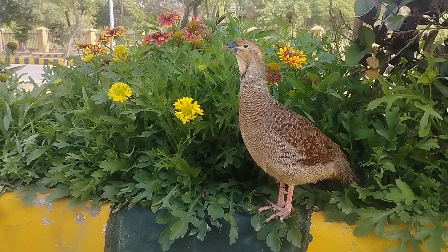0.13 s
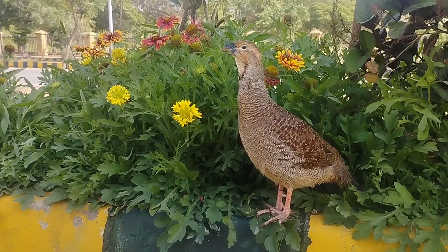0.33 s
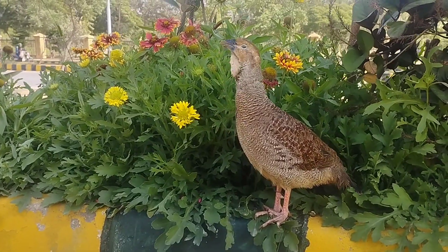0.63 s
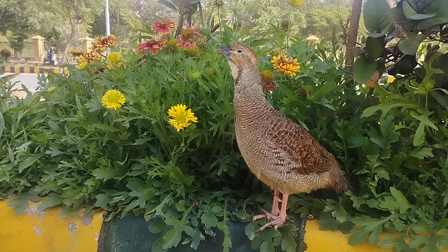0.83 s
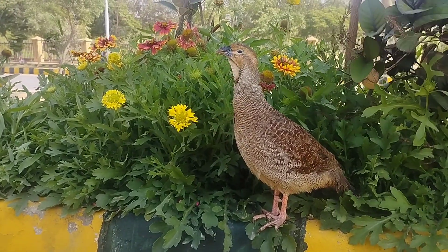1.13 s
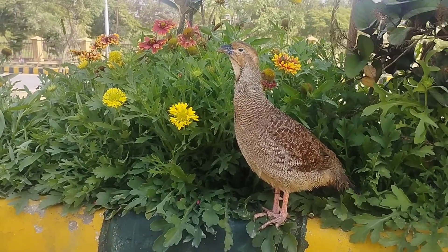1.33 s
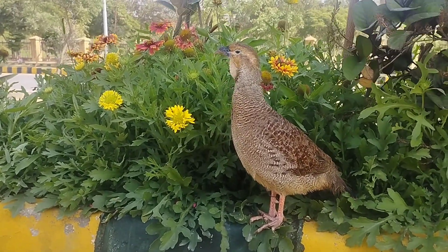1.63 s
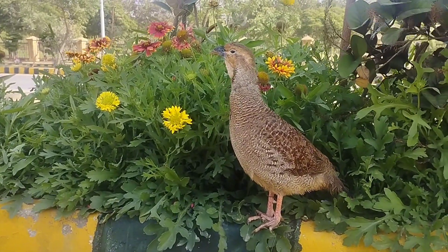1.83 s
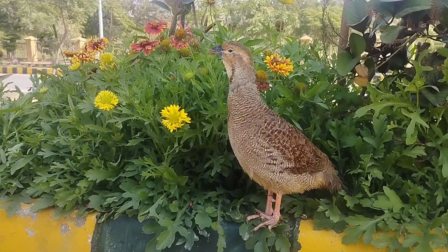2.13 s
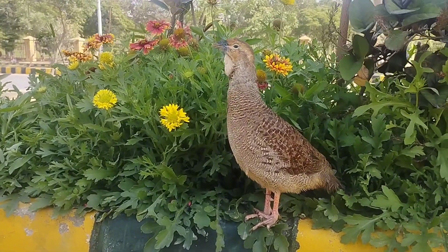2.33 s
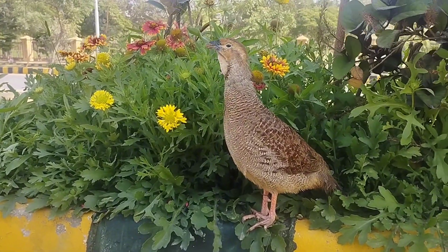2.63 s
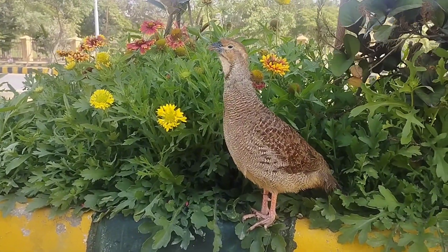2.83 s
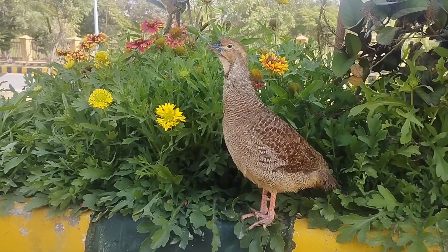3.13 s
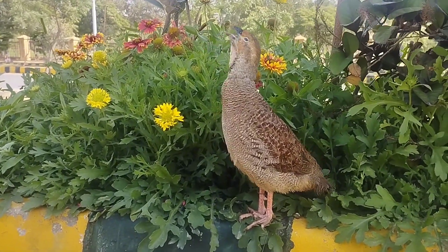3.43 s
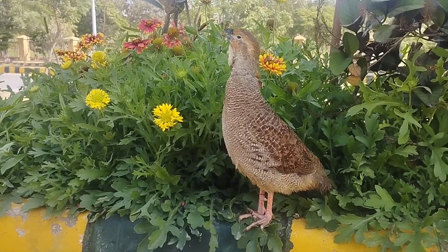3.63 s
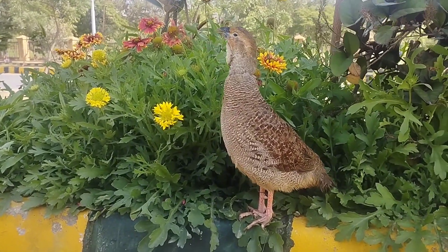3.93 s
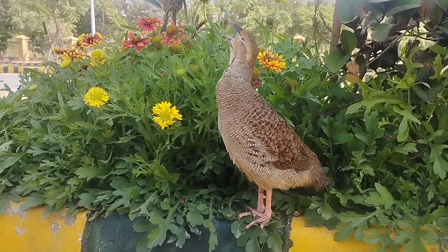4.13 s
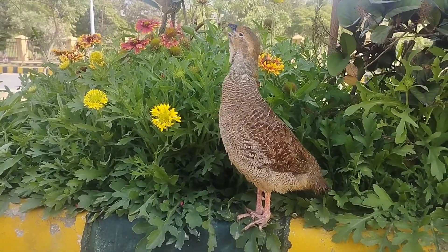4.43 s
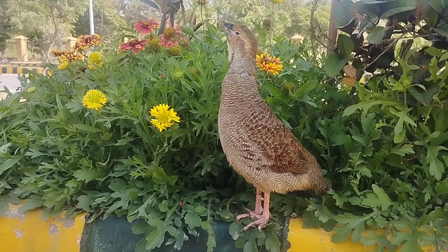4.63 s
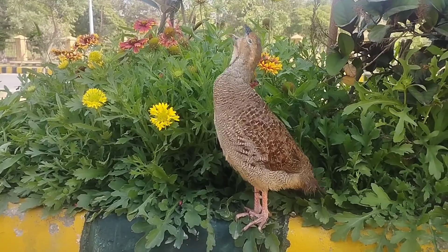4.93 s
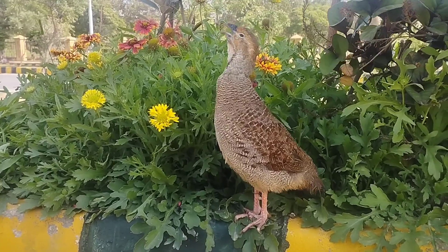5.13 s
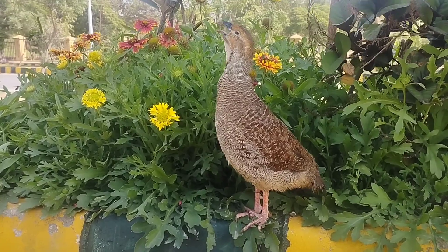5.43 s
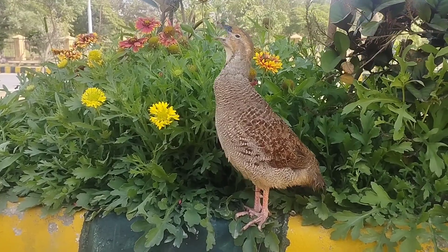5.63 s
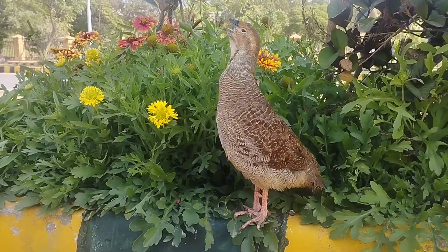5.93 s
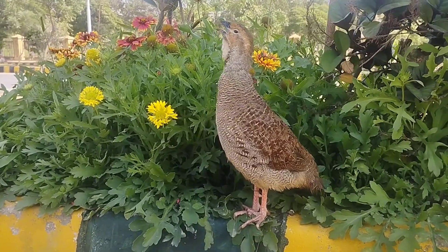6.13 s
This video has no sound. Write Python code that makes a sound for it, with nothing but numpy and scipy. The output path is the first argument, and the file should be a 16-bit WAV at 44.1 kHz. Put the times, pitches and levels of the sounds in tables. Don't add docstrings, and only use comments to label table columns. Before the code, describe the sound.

Outdoors, close to a phone in roadside plants, two francolins duet. From the start a low motor hums, swelling and then cutting out around 1 s; soft distant traffic continues. One bird gives loud, breathy whistles, each about a quarter second and sliding upward, at 0.5, 1.3, 2.2, 3.0, 3.9, 4.8 and 5.5 s. The mate, on the left, adds small murmurs and short arched notes near 0.65 and 2.3 s. A tiny dry leaf snap comes at 1.85 s. From about 3.4 s the mate chatters strongly: sharp two-note calls at 3.4, 4.2, 5.0 and 5.8 s, followed by runs of lower throaty clucks and rasps, ending with a loud pair after 6.1 s. Short leafy reflections surround the calls. Wind rumbles and thumps from 0.8 s onward, strongest near 1.3 and 4.5 s, while a faint engine swells and fades.

```python
import sys
import numpy as np
from scipy import signal
from scipy.fft import rfft, irfft
from scipy.io import wavfile
from scipy.ndimage import uniform_filter1d, minimum_filter1d

SR = 44100
rng = np.random.default_rng(int(sys.argv[2]) if len(sys.argv) > 2 else 0)


def magnitude_from_level(level_db):
    exponent = np.asarray(level_db, float) / 20
    return 10 ** exponent


def wav_out(sig):
    wavfile.write(sys.argv[1], SR, np.round(np.clip(np.atleast_2d(sig).T, -1, 1) * 32767).astype(np.int16))


N = 277389
TIME = np.arange(N) / SR
HZ = np.fft.rfftfreq(N, 1 / SR)


def unit(x):
    return x / np.sqrt(np.mean(x ** 2))


def shape(points, hz):
    at, db = np.transpose(points)
    return magnitude_from_level(np.interp(np.log(np.maximum(hz, 1)), np.log(at), db))


def band(x, lo_hz, hi_hz, order=2):
    sos = signal.butter(order, [lo_hz, min(hi_hz, .45 * SR)], "band", fs=SR, output="sos")
    return signal.sosfilt(sos, x)


def filtered(x, gain):
    return irfft(rfft(x) * gain, N)


def hiss(gain):
    return unit(filtered(rng.standard_normal(N), gain))


def walk(rate):
    k = int(SR / rate)
    steps = np.repeat(rng.standard_normal(N // k + 1), k)
    return unit(uniform_filter1d(uniform_filter1d(steps, k), k)[:N])


def swell(size, peak, sharp):
    u, peak = np.linspace(0, 1, size), np.clip(peak, .05, .95)
    ramp = np.where(u < peak, u / peak, (1 - u) / (1 - peak))
    return np.sin(np.pi / 2 * ramp) ** sharp


def edges(t, length, start_db, attack_s, end_db, release_s):
    start = start_db * np.exp(np.minimum(-t / attack_s, 5))
    end = end_db * np.exp(np.minimum((t - length) / release_s, 5))
    return magnitude_from_level(-start - end)


def glide(hz):
    return 2 * np.pi * np.cumsum(hz) / SR


def add(track, s, sound):
    i = int(s * SR)
    track[i:i + len(sound)] += sound[:N - i]


# (frequency [Hz], level [dB per Hz])
TRAFFIC = [(59, -28.5), (100, 0), (219, -10.5), (264, -9), (306, -7.5), (363, -31.5), (387, -39.5),
           (458, -17.5), (810, -32), (1430, -35), (1560, -37.5), (2050, -29.5), (15600, -62.5)]
TRAFFIC_DB = -40.5


def traffic():
    out, rise = 0, walk(0.78)
    notch = 1 - 0.87 * np.exp(-((HZ - 8500) / 2000) ** 2)
    for hz in 100 * 2. ** np.arange(8):
        octave = np.exp(-(np.log2(np.maximum(HZ, 1) / hz) / 0.756) ** 2)
        gain = shape(TRAFFIC, HZ) * notch * octave
        mid, side = hiss(gain), hiss(gain) * (.2 if hz < 1000 else .95)
        strength = np.sqrt(np.mean(gain ** 2) * (1 if hz > 250 else .5))
        flicker = magnitude_from_level(rise / 2 + (3.6 if hz < 1000 else 1) * walk(4.9))
        out = out + strength * flicker * np.array([mid + side, mid - side])
    return unit(out) * magnitude_from_level(TRAFFIC_DB + 4.0)


# (time [s], pitch [Hz], level [dB])
HUM = [
    (0.0, 135.8, -24),
    (0.49, 137.2, -18.5),
    (0.682, 137.7, -23.5),
    (0.932, 138.3, -17.5),
    (1.0, 138.7, -25),
    (1.08, 145, -45),
]
# (multiple of the pitch, level [dB])
HUM_ORDERS = [(1.003, 0.5), (1.335, -15), (2, -19), (3.078, -27.5)]
# (time [s], pitch [Hz], level [dB])
ENGINE = [
    (1.1, 282.1, -63.5),
    (1.68, 302.2, -37),
    (3.21, 310.5, -65),
    (3.34, 282.7, -38.5),
    (4.37, 306, -40),
    (4.45, 284.3, -35.5),
    (4.97, 298, -44),
    (6.29, 295, -32),
]
# (pitch [Hz], width [Hz], level [dB])
DRONES = [(98, 28, -38), (359.4, 4.8, -56), (448.2, 15, -49.5), (527.8, 21, -50.5), (618, 110, -54)]


def level_curve(table):
    s, _, db = np.transpose(table)
    return magnitude_from_level(np.interp(TIME, s, db, -200, -200))


def motors():
    s, hz, _ = np.transpose(HUM)
    phase = glide(np.interp(TIME, s, hz) * (1 + 0.0059 * walk(25)))
    stack = sum(magnitude_from_level(order_db + 0.55 * walk(30.0)) * np.sin(k * phase) for k, order_db in HUM_ORDERS)
    hum = np.sqrt(2) * uniform_filter1d(level_curve(HUM), size=900) * stack
    s, hz, _ = np.transpose(ENGINE)
    phase = glide(np.interp(TIME, s, hz) * (1 + 0.01589 * walk(30)))
    far = np.sqrt(2) * level_curve(ENGINE) * magnitude_from_level(0.32 * walk(25)) * np.sin(phase)
    for hz, width, db in DRONES:
        far = far + magnitude_from_level(db + 2.2 * walk(1.1)) * hiss(1 / (1 + (2 * (HZ - hz) / width) ** 2))
    late = np.roll(hum, 40) + np.roll(far, 15)
    return np.array([(hum + far) * magnitude_from_level(-1.1), late * magnitude_from_level(-2.5)])


# (time [s], rumble level [dB], left minus right [dB])
WIND = [(0.0, -36, -2.5), (0.77, -38, 6.5), (1.35, -22, -4.5), (1.4, -33.5, 9), (2.08, -33.5, -2),
        (2.47, -33.5, 18), (2.66, -33, -1.5), (3.13, -39, 11), (3.43, -34.5, -3), (3.61, -35.5, 11.5),
        (3.73, -26.5, -2), (4.311, -42.5, 8), (4.48, -19.5, 6.5), (5.04, -38.5, 10), (5.259, -27, -2),
        (5.68, -36.5, 13), (6.03, -35, -4.5), (6.29, -31.5, 3)]
# (time [s], peak level [dB], left minus right [dB])
THUMPS = [(0.83, -13, 1), (1.21, -9, -0.5), (1.26, -7, -2.5), (1.318, -3.5, 1.5), (1.611, -4.5, -10),
          (1.762, -16.5, -0.5), (2.187, -12.5, 1.5), (2.214, -4, 8), (2.419, -15, 17), (2.54, -9.5, -7.5),
          (2.839, -11, 4.5), (3.572, -15.5, 2.5), (3.649, -6.5, -1.5), (3.93, -9, 3), (4.423, -8.5, -4.5),
          (4.539, -10, 9), (4.68, -7.5, 0), (4.751, -9.5, -5), (5.22, -14.5, 1.5), (5.45, -9, 8.5),
          (5.93, -9, 4.5)]
FLUTTER_DB, FLUTTER_LAG = -7, 0.25
RUMBLE_WALK_DB = 3


def wind():
    s, *columns = np.transpose(WIND)
    db, pan_db = (np.interp(TIME, s, c) for c in columns)
    flutter_db = FLUTTER_DB - FLUTTER_LAG * (db + 34.5)
    deep = shape([(10, -22.5), (25, 7.5), (60, 8.0), (110, -1.0), (200, -10.5), (400, -71.5)], HZ)
    colour = shape([(60, -22.5), (120, 12.0), (250, 0.5), (500, -9.5), (1000, -70.5)], HZ)
    shared = hiss(colour) * magnitude_from_level(2.43 * walk(30))
    out = []
    for side in (1, -1):
        rumble = hiss(deep) * magnitude_from_level(RUMBLE_WALK_DB * walk(12))
        flutter = 0.644 * hiss(colour) * magnitude_from_level(2.4 * walk(38)) + 0.69 * shared
        port = magnitude_from_level(db + 2.5 + side * pan_db / 2) * (rumble + magnitude_from_level(flutter_db + 3.5) * flutter)
        for s, thump_db, left_db in THUMPS:
            thump = unit(band(rng.standard_normal(2600), 51, 238)) * swell(2600, 0.25, 10.0)
            add(port, s - .008, magnitude_from_level(thump_db - 14.0 + side * left_db / 2) * thump)
        out.append(port)
    return np.array(out)


# (time [s], peak level [dB])
TICK = [
    (1.847, -45),
]


def leaf():
    out = np.zeros(N)
    for s, db in TICK:
        snap = unit(band(rng.standard_normal(300), 3800, 11000))
        add(out, s, magnitude_from_level(db) * snap * np.exp(-np.arange(300) / 70))
    return out


def echoes(x, t60, wait_s, lo_hz, hi_hz):
    t = np.arange(SR // 2) / SR
    tail = rng.standard_normal((2, len(t))) * magnitude_from_level(-60 * t / t60) * np.clip(t / wait_s, 0, 1)
    tail = band(tail, lo_hz, hi_hz)
    return signal.fftconvolve(x[None], tail / np.sqrt(np.sum(tail[0] ** 2)), axes=1)[:, :N]


# (frequency [Hz], level [dB])
SHADOW = [(700, 0.5), (1700, 5.5), (2600, -20.5), (3600, 4.5), (4500, -5.5), (6000, 3.5), (9600, 5.5),
          (13500, 22.5)]


def from_left(x, lead):
    turn = np.exp(.5j * lead) * np.sqrt(shape(SHADOW, HZ))
    return filtered(x, np.array([turn, 1 / turn]))


# (time [s], pace [ratio], steady pitch [Hz], falling pitch [Hz], falling level [dB])
PHRASES = [
    (3.427, 0.7755, 1857, 2217, -14.5),
    (4.235, 0.977, 1912, 2279, -15.5),
    (4.999, 1.01, 1934, 2361, -12),
    (5.758, 1.0425, 2422, 2296, -9.5),
]
# (time from the steady note [s], length [s], throat [Hz], peak [dB], treble [dB])
CALL_RASPS = [
    (-0.05, 0.0387, 2000, -30.5, 5.5),
    (-0.011, 0.024, 1710, -28.5, 2),
    (0.028, 0.026, 1770, -37, 9),
    (0.099, 0.02086, 1685, -30.5, -4.5),
]
# (time of the note [s], length [s], start pitch [Hz], note level [dB], rasp level [dB])
CLUCKS = [
    (4.484, 0.0338, 1583, -7, -15),
    (4.605, 0.0305, 1500, -10.5, -17.5),
    (4.726, 0.021, 1446, -10, -20.5),
    (4.837, 0.026, 1443, -21, -24.5),
    (5.262, 0.0342, 1838, -10.5, -19.5),
    (5.392, 0.0324, 1592, -9.5, -15.5),
    (5.513, 0.0331, 1555, -11, -18),
    (5.629, 0.023, 1543, -16.5, -29),
    (6.163, 0.0361, 1621, -8.5, -17),
    (6.281, 0.11, 1631, -13.5, -23),
]
# (time [s], length [s], throat [Hz], peak [dB], treble [dB])
MURMURS = [(0.038, 0.069, 1116, -45.5, -8), (0.625, 0.029, 1600, -24, -16.5),
           (0.891, 0.0098, 1446, -46, -12), (1.608, 0.045, 1208, -41, -18.5),
           (1.64, 0.056, 950, -38.5, -18.5), (2.259, 0.027, 1649, -22, -17.5),
           (2.511, 0.069, 1021, -31, -28.5), (2.627, 0.074, 1102, -39, -28.5),
           (3.322, 0.024, 1787, -29.5, -31.5), (3.372, 0.035, 1943, -20, -22),
           (3.64, 0.0545, 1325, -22.5, -17), (3.752, 0.0551, 1249, -23.5, -25),
           (3.863, 0.0656, 1145, -26.5, -39.5), (3.958, 0.06, 1347, -27, -24),
           (6.008, 0.0378, 1954, -17, -3.5), (6.043, 0.037, 2000, -39, 11.5)]
MURMUR_PEAK = 0.504
CLUCK_LEAD_S, CLUCK_THROAT, CLUCK_TREBLE_DB, TREBLE_DB_PER_KHZ = 0.01907, 1, -14.5, 39.5
UNDER_DB, UNDER_THROAT = -14, 0.9


def bursts():
    rows = [(*m, MURMUR_PEAK) for m in MURMURS]
    for s, pace, *_ in PHRASES:
        rows += [(s + at * pace, *rest, 0.3) for at, *rest in CALL_RASPS]
    for s, length, hz, _, db in CLUCKS:
        treble_db = CLUCK_TREBLE_DB + TREBLE_DB_PER_KHZ * (hz - 1500) / 1000
        rows += [(s - CLUCK_LEAD_S, CLUCK_LEAD_S + 0.00907, CLUCK_THROAT * hz, db, treble_db, 0.7),
                 (s, length + 0.01243, UNDER_THROAT * hz, db + UNDER_DB, treble_db + 5.5, 0.6)]
    return rows


# (frequency [Hz], level [dB])
THROAT = [(1500, -10.5), (2900, 3), (3900, -1), (4500, 3.5), (5300, -6), (6000, -10.5), (8300, -22),
          (10000, -24.5), (15500, -27.5)]


def rasps():
    out, slaps = np.zeros(N), np.zeros(N)
    gaps = SR / 480 * np.exp(.22 * rng.standard_normal(N // 40))
    at = np.cumsum(gaps).astype(int)
    at = at[at < N]
    slaps[at] = magnitude_from_level(2 * rng.standard_normal(len(at)))
    source = unit(slaps) + .9 * rng.standard_normal(N)
    treble_only = (HZ > 3000) / (1 + (4100 / np.maximum(HZ, 1)) ** 12) / (1 + (HZ / 12000) ** 2)
    treble = hiss(shape(THROAT, HZ) * treble_only) * (0.807 + unit(uniform_filter1d(slaps, size=60)) / 10)
    for s, length, throat_hz, db, treble_db, peak in bursts():
        i, size = int(s * SR), int(length * SR)
        push = source[i:i + size]
        low = band(push, 932.7, 1152.7) + 0.963 * band(push, 1392, 1459)
        middle = 1.523 * band(push, 0.692 * throat_hz, 1.278 * throat_hz)
        middle = middle + magnitude_from_level(5.0 + 0.5 * (db + 19)) * band(push, 1790, 1942)
        high = band(push, 2326, 2500)
        beak = 0.21 * magnitude_from_level(0.69 * (db + 19.0)) * band(push, 2554, 3168, order=3)
        body = unit(low + magnitude_from_level(.45 * (db + 17)) * (.85 * middle + .45 * high + beak))
        rise = swell(len(push), peak, 1.0)
        add(out, s, magnitude_from_level(db) * rise * (body + magnitude_from_level(treble_db - 2.0) * rise * treble[i:i + size]))
    return out


# (time from the steady note [s], length [s], start [Hz], end [Hz], peak [dB])
OPENING = [
    (-0.044, 0.013, 2317, 2400, -19),
    (-0.038, 0.022, 1803, 1820, -16),
    (-0.024, 0.01, 2650, 2350, -19),
    (-0.02, 0.019, 895, 1000, -24.5),
]
# (time from the steady note [s], length [s], start [Hz], end [Hz], peak [dB])
LINKS = [
    (0.028, 0.015, 921.3, 921.3, -31),
    (0.051, 0.016, 1890, 1968, -30),
    (0.1, 0.014, 1950, 1750, -24.5),
]
# (time [s], length [s], start pitch [Hz], end pitch [Hz], peak [dB])
CHIRPS = [(0.049, 0.055, 1026, 872.5, -41.5), (1.613, 0.038, 1050, 877.3, -44),
          (0.646, 0.012, 888, 972.4, -28.5), (0.678, 0.034, 1177, 939, -26),
          (2.34, 0.026, 1221, 872.4, -25), (2.529, 0.051, 1075, 954, -29.5),
          (2.639, 0.031, 1070, 951.4, -34), (3.33, 0.012, 995, 1065, -31.5),
          (3.38, 0.032, 971.6, 970, -22.5), (3.392, 0.019, 2086, 1842, -9),
          (3.414, 0.013, 855.6, 874, -25.5), (3.484, 0.049, 1103, 941, -44.5),
          (3.501, 0.018, 1477, 1310, -26), (3.665, 0.01, 1512, 1373, -18), (3.682, 0.02, 1118, 963.5, -23),
          (3.78, 0.0268, 1181, 1036, -21.5), (3.88, 0.028, 1094, 989.5, -19.5),
          (3.976, 0.0399, 1058, 960, -28.5), (4.742, 0.023, 1262, 1038, -18),
          (5.288, 0.02474, 2014, 1725, -15.5),  (6.03, 0.022, 1768, 1850, -1),
          (6.046, 0.0359, 2114, 1812, -13.5)]
# (time [s], length [s], start pitch [Hz], end pitch [Hz], peak [dB])
ARCHES = [
    (0.647, 0.039, 1386, 1268, -15.5),
    (2.28, 0.062, 1472, 1273, -11.5),
]
# (time [s], pitch [Hz], peak [dB])
BREAKS = [(3.469, 1967, -12.5), (5.052, 1903, -21), (5.785, 2033, -6), (5.813, 1985, -11),
          (5.286, 1989, -13.5), (5.385, 1784, -20), (5.391, 1781, -13), (6.02, 1992, -15),
          (6.048, 1994, -14), (6.156, 1880, -13.5), (5.255, 1771, -13.5)]
STEADY_EXTRA_DB = [-1.5, 3, 1.5, -2]
FALL_SAGS = [0.16, 0.18, 0.16, 0.1]
STEADY_S, STEADY_SAG, STEADY_DB, STEADY_PEAK = 0.0305, 0.0402, -2.5, 0.41
FALL_WAIT_S, FALL_S, FALL_PEAK = 0.055, 0.0614, 0.018
CLUCK_SAG_HZ_PER_S, CLUCK_PEAK = 9500, 0.449
CHIRP_PEAK, ARCH_PEAK, BREAK_S = 0.33, 0.6, 0.0059


def notes():
    rows = [(*c, CHIRP_PEAK) for c in CHIRPS] + [(*a, ARCH_PEAK) for a in ARCHES]
    rows += [(s, BREAK_S, hz, hz, db, 0.4) for s, hz, db in BREAKS]
    rows += [(s, length, hz, hz - CLUCK_SAG_HZ_PER_S * length, db, CLUCK_PEAK) for s, length, hz, db, _ in CLUCKS]
    for k, (s, pace, steady_hz, fall_hz, fall_db) in enumerate(PHRASES):
        steady_db, steady_end_hz = STEADY_DB + STEADY_EXTRA_DB[k], steady_hz * (1 - STEADY_SAG)
        fall_end_hz = fall_hz * (1 - FALL_SAGS[k])
        rows += [(s, STEADY_S * pace, steady_hz, steady_end_hz, steady_db, STEADY_PEAK),
                 (s + FALL_WAIT_S * pace, FALL_S * pace, fall_hz, fall_end_hz, fall_db, FALL_PEAK)]
        small = (OPENING if k else []) + LINKS
        rows += [(s + at * pace, *rest, .5) for at, *rest in small]
    return rows


ARCH_BEND, BEND = 2.3, 1.2
PIP_SCOOP, PIP_SCOOP_S, OVER_FADE_DB = 0.052, 0.003795, 8


def pips():
    out, tremble, wobble = np.zeros(N), walk(500), walk(90)
    air = hiss(shape(THROAT, HZ) * (HZ > 1000))
    for s, length, hz0, hz1, db, peak in notes():
        i = int(s * SR)
        u = np.linspace(0, 1, int(length * SR))[:N - i]
        now = slice(i, i + len(u))
        line = hz0 + (hz1 - hz0) * u ** (ARCH_BEND if peak == ARCH_PEAK else BEND)
        scoop = 1 - PIP_SCOOP * (peak > .2) * np.exp(-u * length / PIP_SCOOP_S)
        arch = 1 + (0.29 + 0.9 * (hz0 < 1700)) * length * np.sin(np.pi * u)
        hz = line * scoop * arch
        slack = np.clip((1850 - hz0) / 280, 0, 1)
        phase = glide(hz) + (.06 + .2 * slack) * tremble[now]
        over = 0
        for k in range(2, 10):
            passed = shape(THROAT, k * hz) * (k * hz < 16000)
            over = over + passed * (k / 2) ** -1.1 / 2 * np.sin(k * phase)
        if hz0 > 1120:
            rich_db = -12 * slack
        else:
            rich_db = 2.5 if hz1 > hz0 else -19
        tuned_db = 0.2585 * max(db + 19, 0) + 10 * (length == BREAK_S)
        fade_db = OVER_FADE_DB * u * min(10 * abs(1 - hz1 / hz0), 1)
        flat = 2 if peak == STEADY_PEAK else 1.05
        gain = magnitude_from_level(db + 1.6 * wobble[now]) * np.minimum(flat * swell(len(u), peak, .9), 1)
        detune = magnitude_from_level(-15 * max(1 - 5 * peak, 0) * np.sqrt(u))
        voice = detune * np.sin(phase) + magnitude_from_level(rich_db - tuned_db + 3 - fade_db) * over
        add(out, s, np.sqrt(2) * gain * (voice + magnitude_from_level(-27.5 - tuned_db) * air[now]))
    return out


# (time [s], length [s], start pitch [Hz], end pitch [Hz], level [dB])
WHISTLES = [
    (0.504, 0.2447, 2365, 2913, -9),
    (1.315, 0.2316, 2403, 2902, -8.5),
    (2.186, 0.2339, 2442, 2945, -11.5),
    (2.966, 0.2407, 2406, 3005, -8),
    (3.935, 0.2272, 2429, 2840, -9),
    (4.76, 0.2316, 2491, 2935, -9.5),
    (5.523, 0.228, 2438, 2932, -9),
]
PUFF_DB = [0.5, 2.5, -1, 2, -0.5, 1.5, -0.5]
FADE_DB = [-2.5, -6, -8.5, -4.5, -5, -3.5, -5.5]
BOW = [0.001, 0.003, -0.008, -0.0059, 0.008, -0.0012, -0.02]
# (frequency [Hz], level [dB per Hz])
BREATH_COLOUR = [(1940, -22), (3300, 0.5), (4390, -11.5), (5370, -5.5), (5810, -4.5), (7630, -10.5),
                 (8700, -12), (9580, 0.5), (11200, -21), (12700, -14), (15600, -23.5)]
# (drop at the start [dB], attack [s], drop at the end [dB], release [s])
TONE_EDGES = (24.9, 0.01795, 35.9, 0.01105)
HISS_EDGES = (18.9, 0.0316, 5.23, 0.023)
PIPE_EDGES = (3.5, 0.01384, 7.54, 0.0534)
HISS_DB, PIPE_DB = -41.5, -31.5
SCOOP_HZ, SCOOP_S = 222.2, 0.028
CATCH_S, CATCH_DB, CATCH_RISE_S = 0.0089, 7, 0.002


def whistler():
    rows = np.array(WHISTLES)
    which = np.clip(np.searchsorted(rows[:, 0] - .2, TIME) - 1, 0, None)
    s, length, hz0, hz1, db = rows[which].T
    t, puff_db = TIME - s, np.array(PUFF_DB)[which]
    share = np.clip(t / length, .02, 1)
    hz = hz0 + (hz1 - hz0) * share - SCOOP_HZ * np.exp(-share * length / SCOOP_S)
    bow = np.array(BOW)[which] * np.sin(np.pi * share ** 1.2)
    phase = glide(hz * (1 + 0.00205 * walk(150) + bow))
    catch_db = CATCH_DB / (1 + np.exp(np.clip((t - CATCH_S) / CATCH_RISE_S, -9, 9)))
    gain = magnitude_from_level(db + np.array(FADE_DB)[which] * (share - .5)) * edges(t, length, *TONE_EDGES)
    gain = gain * magnitude_from_level(0.84 * walk(80) - catch_db)
    octave = magnitude_from_level(-33) * (hz / 2700) ** 5 * np.clip(t / 0.046, 0, 1) * np.sin(2 * phase)
    tone = np.sqrt(2) * gain * (np.sin(phase) + octave)

    pipe = magnitude_from_level(PIPE_DB + puff_db / 2) * edges(t, length, *PIPE_EDGES)
    puff = magnitude_from_level(HISS_DB + puff_db) * edges(t, length, *HISS_EDGES)
    air = hiss(shape(BREATH_COLOUR, HZ) * (HZ > 3000)) * magnitude_from_level(5.0)
    lower = filtered(air, 1 / (1 + (HZ / 7800) ** 6))
    upper = air - lower
    air = lower * magnitude_from_level(walk(25)) + upper * magnitude_from_level(1.8 * walk(65) + 4.3 * (share - 1.5))

    def ringing(db, lo_hz, hi_hz, multiple):
        slow = unit(band(rng.standard_normal(N), lo_hz, hi_hz))
        return magnitude_from_level(db) * slow * np.sin(multiple * phase)

    under = ringing(1.0, 0.74, 85, .82)
    low = ringing(-8.0, 0.54, 200, .62)
    skirt = ringing(-6.0, 0.45, 600, 1.05)
    air = air + ringing(-2.0, 0.99, 490, 3.55)
    return tone + pipe * (under + low + skirt), puff * air


# (frequency [Hz], lead [radians])
LEAD = [(2100, -0.25), (2750, 1.6), (3400, 2.8), (4500, 3.4), (5500, 5.6), (6200, 7.9), (8600, 11.4),
        (13000, 13.1)]
CLEAR_DRY = .75


def scene():
    (tone, air), clear = whistler(), pips()
    mate = filtered(clear + rasps(), 1 - 0.5 * np.exp(-((HZ - 3420) / 170) ** 2))
    near = np.array([tone * magnitude_from_level(0.48), np.roll(tone, -1) * magnitude_from_level(3.5)])
    near = near + from_left(mate, np.interp(HZ, *np.transpose(LEAD)) * (HZ > 1300))
    near = near + from_left(air, 6e-5 * (HZ - 2000)) + magnitude_from_level(-24.0) * echoes(air, 0.063, 0.0033, 3000, 16000)
    space = magnitude_from_level(-18.5) * echoes(tone, 0.12, 0.009, 1200, 9000)
    space = space + magnitude_from_level(-2.5) * echoes(mate - CLEAR_DRY * clear, 0.0363, 0.0021, 1000, 9200)
    space = space + magnitude_from_level(-45.0) * echoes(mate, 0.65, 0.029, 1700, 3000)
    space = space + magnitude_from_level(-42.0) * echoes(clear, 0.46, 0.13, 4090, 4900)
    return near + space + leaf() + wind() + motors() + traffic()


def band_limit(x):
    return signal.sosfilt(signal.butter(12, 15750, fs=SR, output="sos"), x)


def record(dry):
    peak = -minimum_filter1d(-np.abs(dry).max(axis=0), size=200)
    gain = uniform_filter1d(np.minimum(1, 0.85 / peak) ** 0.8, size=200)
    mix = filtered(np.clip(dry * gain, -1, 1), HZ < 15750)
    return band_limit(mix)


dry = scene()
out = record(dry)
wav_out(out)
```